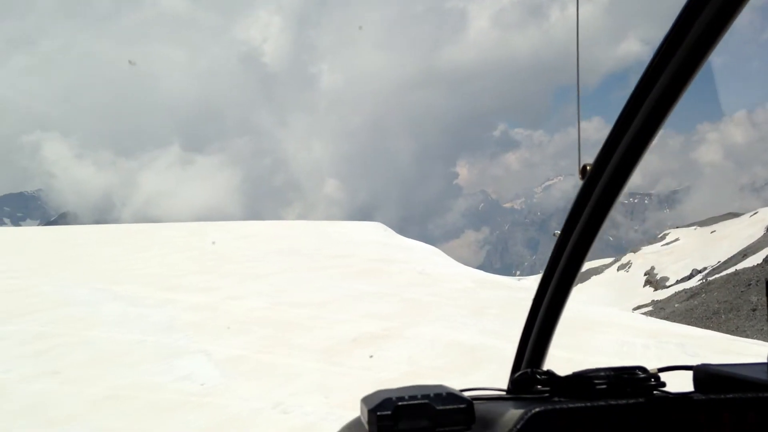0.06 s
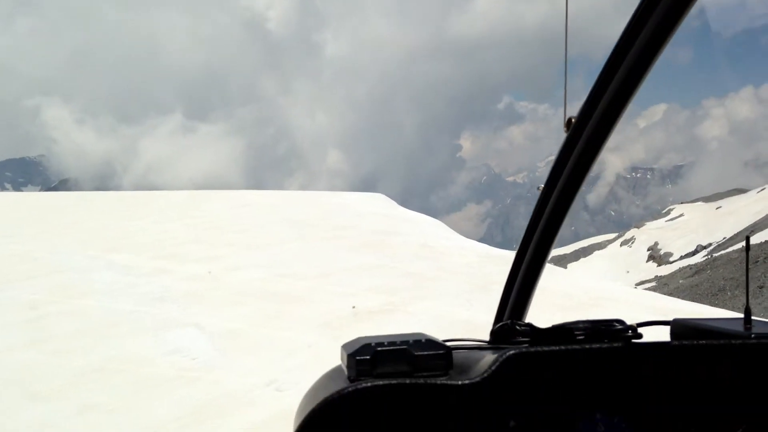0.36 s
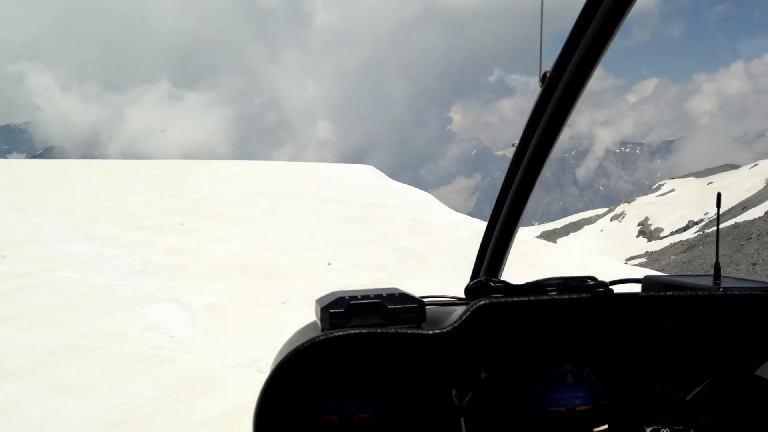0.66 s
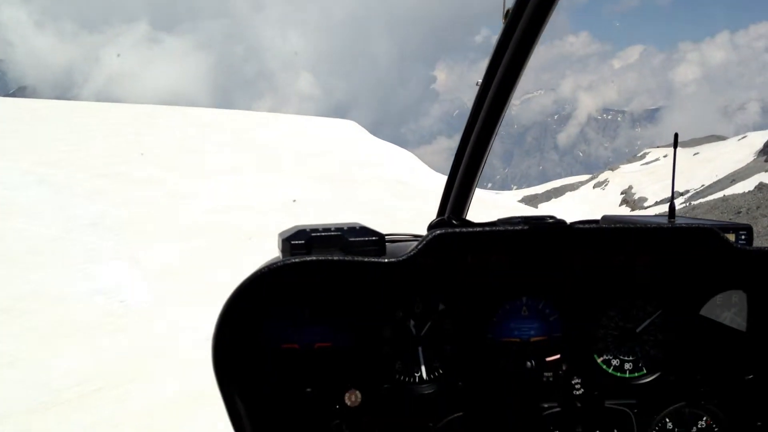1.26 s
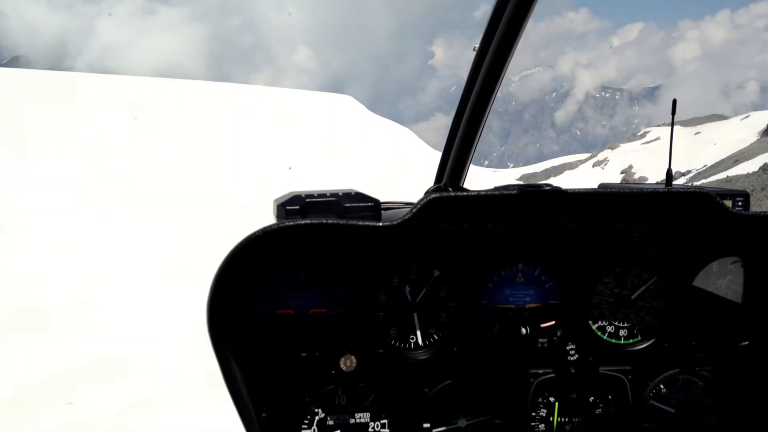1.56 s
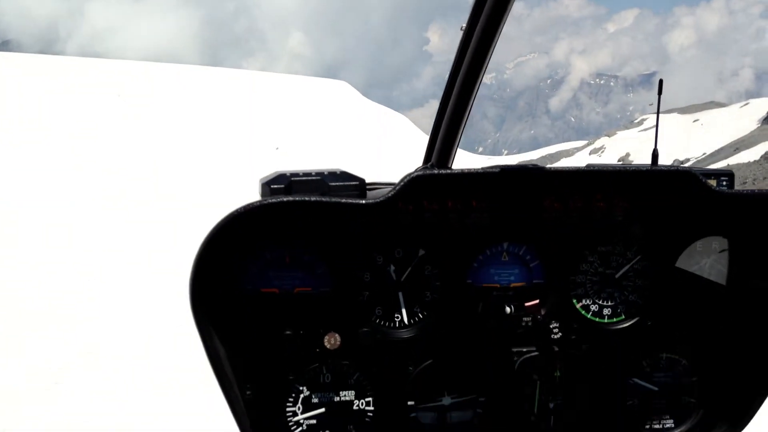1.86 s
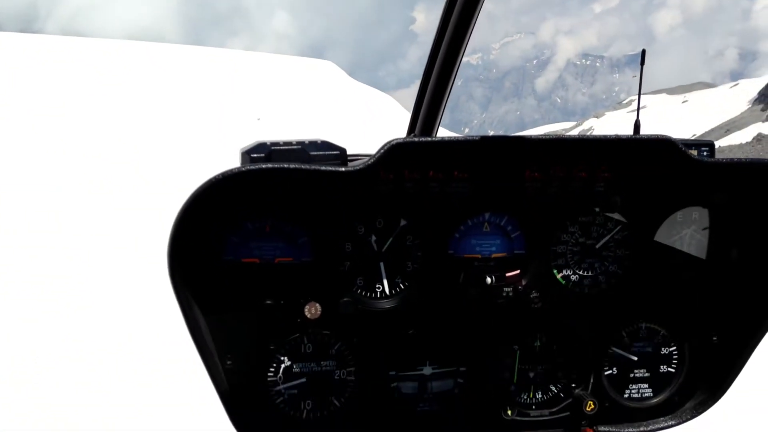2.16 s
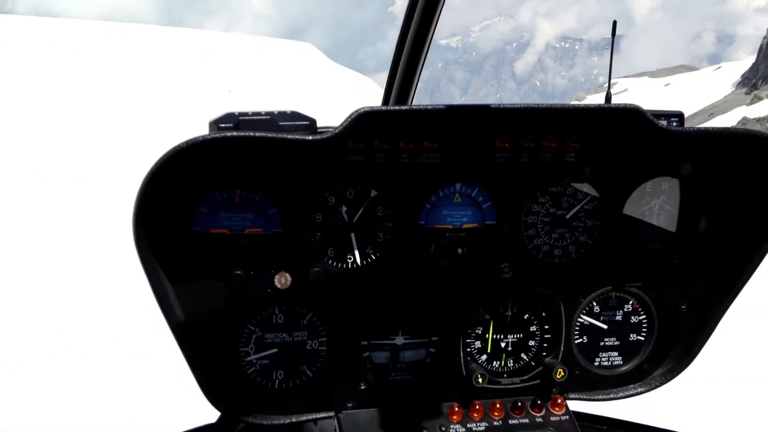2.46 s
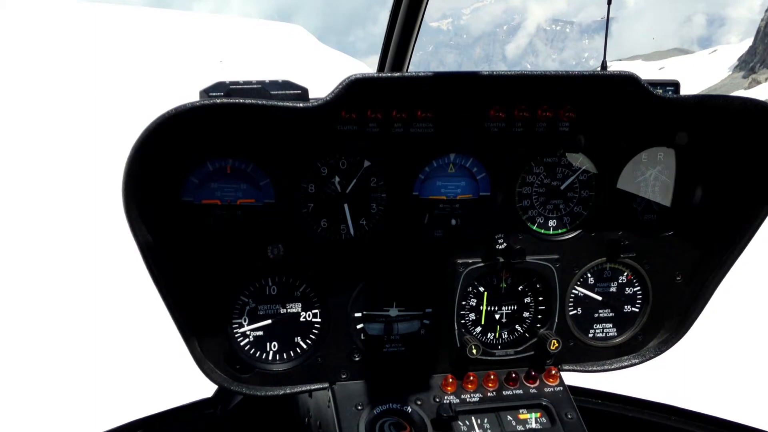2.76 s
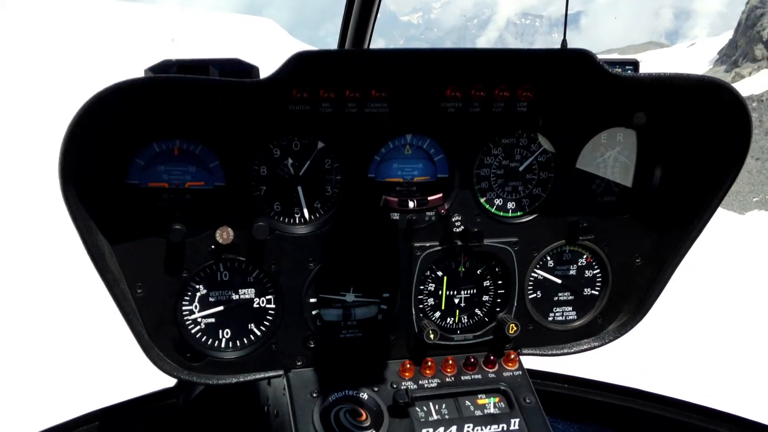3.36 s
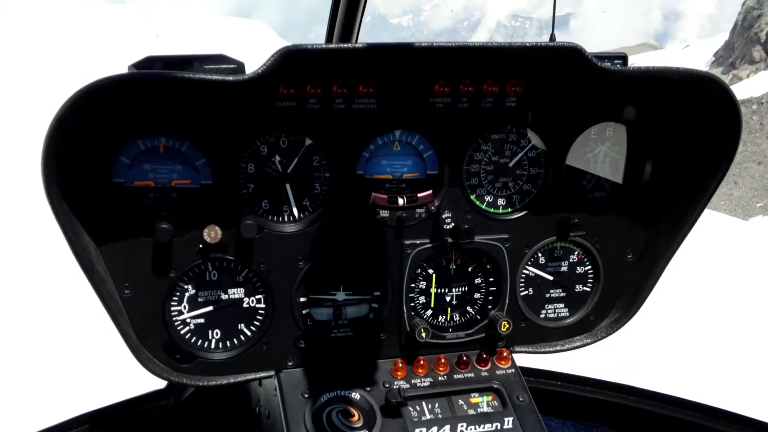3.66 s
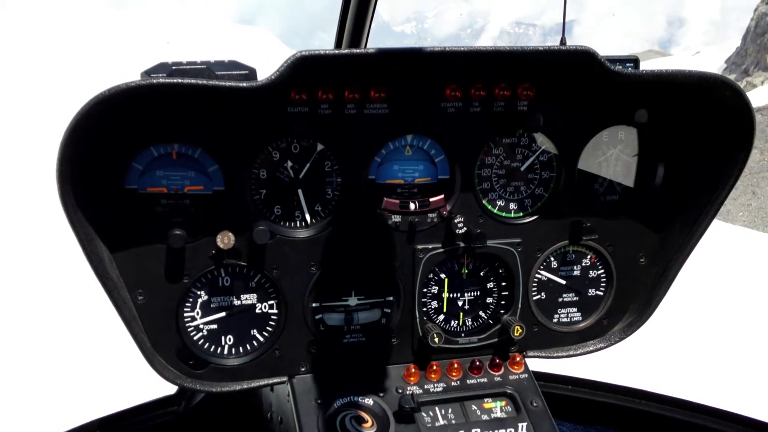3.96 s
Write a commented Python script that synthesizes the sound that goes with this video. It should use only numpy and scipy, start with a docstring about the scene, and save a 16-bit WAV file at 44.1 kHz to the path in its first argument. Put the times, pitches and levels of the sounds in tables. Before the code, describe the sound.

A small helicopter is heard from inside its cabin for about four seconds. From the start, the engine drones with a wavering fan hum, while the rotor thumps rapidly and evenly and air rushes in pulses. At about 1 second, sharper blade slaps with a bright crack join, growing slightly and lasting to the end. Beneath, soft irregular knocks continue and a low roar gradually eases.

```python
"""Inside a light piston helicopter, low over a snowfield. The six-cylinder engine drones, its fan hums.
Each pass of a main blade thumps the cabin; after a second the blades start slapping through their own
wake, ringing the panels with a bright crack on top. Air rushes over the canopy, surging and pulsing
with the rotor. Soft knocks and the low roar of the airframe fill out the bottom end."""
import sys
import numpy as np
from scipy import signal
from scipy.fft import rfft, irfft
from scipy.io import wavfile
from scipy.ndimage import uniform_filter1d

SR = 44100
rng = np.random.default_rng(int(sys.argv[2]) if len(sys.argv) > 2 else 0)


def generate_wav(sig):
    """Save sig (samples, or channels by samples) to the path in sys.argv[1] as 16-bit PCM at SR."""
    pcm = np.round(np.clip(np.atleast_2d(sig).T, -1, 1) * 32767).astype(np.int16)
    wavfile.write(sys.argv[1], SR, pcm)


N = 176400
BLADE_HZ, FIRST_PASS_S = 13.5241, .0324
CYCLE_HZ, FAN_HZ = 22.6, 386.3  # one four-stroke cycle is two crankshaft turns

# A gain_db is relative: the layer's overall level is set in its function.
# Engine partials, the sixth being the firing rate: cycle_multiple, level_db, waver_db
ENGINE_PARTIALS = [(5, -40, 2), (6, -16.5, 0.52), (7, -31.5, 3.5), (8, -27, 2.5), (9, -30.5, 1.5),
                   (10, -30.5, 2), (11, -35, -2.5), (12, -28, 2), (14, -43.5, -2), (18, -38, 1.5),
                   (24, -48.5, -1), (48, -49, -1.5), (54, -50, 1)]
# Fader rides through the flight: time_s, thump_gain_db, air_gain_db, fan_gain_db
FLIGHT_RIDES = [(0, 4, 0.5, 1.5), (.4, 1.5, -1, 6), (.55, -11, -1, 1), (.72, 3.5, -.5, 2.5),
                (1.1, 1.5, -.5, 4), (1.35, -4.5, -1.5, -2), (2.3, 1.5, -.5, 1), (2.6, -0.5, -0.5, -0.5),
                (3, -1, 0, 0.5), (4, 0, -2.5, -3)]
# Boom of the cabin's air under each thump: pitch_hz, gain_db, t60_s
CABIN_MODES = [(164.4, 4, 0.17), (204.7, 11.5, 0.21), (230, -39, 0.045), (278, -14, 0.065)]
# Ring of the panels under each slap: pitch_hz, gain_db, t60_s
PANEL_MODES = [(394, -10.5, .035), (486, 5, 0.048), (531, 3.5, 0.044), (624, 2, 0.073), (704, 3, 0.038),
               (790, -9.5, 0.023), (866, 2.5, 0.032), (913, -4.5, 0.026), (1083, -8, 0.039),
               (1177, 0, 0.069), (1202, -19, 0.063)]
# Blade slaps: start_s, body_gain_db, crack_gain_db
SLAP_HITS = [(0.92, -23.0, -39.0), (0.994, -24.0, -32.5), (1.068, -20.5, -30.0), (1.142, -20.5, -27.5),
             (1.215, -22.5, -33.5), (1.289, -23.0, -26.5), (1.363, -23.0, -31.5), (1.437, -23.0, -30.5),
             (1.511, -21.5, -34.0), (1.585, -21.0, -31.0), (1.659, -20.5, -27.5), (1.733, -19.5, -28.0),
             (1.807, -21.5, -33.0), (1.881, -22.0, -28.5), (1.955, -19.5, -27.5), (2.029, -21.5, -29.5),
             (2.103, -22.0, -31.0), (2.177, -21.0, -30.5), (2.251, -20.0, -32.0), (2.325, -22.5, -36.5),
             (2.399, -20.5, -32.5), (2.472, -20.5, -34.5), (2.546, -19.5, -30.5), (2.62, -19.0, -31.0),
             (2.694, -19.0, -34.5), (2.768, -20.0, -33.0), (2.842, -18.0, -30.0), (2.916, -17.0, -36.5),
             (2.99, -18.0, -32.0), (3.064, -19.0, -31.0), (3.138, -18.5, -32.0), (3.212, -18.0, -33.5),
             (3.286, -17.5, -29.0), (3.36, -18.5, -32.5), (3.434, -18.0, -28.5), (3.508, -20.5, -34.0),
             (3.582, -18.5, -30.0), (3.656, -19.5, -36.5), (3.73, -21.0, -31.0), (3.803, -20.0, -31.5),
             (3.877, -20.0, -29.5), (3.951, -19.5, -28.5)]
# Blows within a slap, three vortices then two cabin echoes: delay_s, first_slap_gain_db, last_slap_gain_db
SLAP_BLOWS = [(-.003, 0, 6), (.00025, 8.5, 5), (.0051, -1, 11), (0.0114, -1.5, -2.5), (0.0151, -9.5, -0.5)]
# EQ of the cracks and puffs: frequency_hz, gain_db
CRACK_EQ = [(400, 7), (800, 7), (1250, -4), (1480, -12), (1950, 1.5), (2700, 0.5), (3700, -3), (5500, -14),
            (9000, -31), (15000, -51)]
# EQ of the air over the canopy: frequency_hz, gain_db
RUSH_EQ = [(100, -26), (300, 3), (450, 6.5), (620, 6.5), (780, 2.5), (1200, 0), (1420, -4.5), (2100, -8),
           (2700, -6.5), (3100, -10.5), (3500, -7.5), (4100, -15), (6000, -18.5), (9000, -27), (12000, -32),
           (15500, -37)]
# Swing of the air's surge: time_s, depth_db
SURGE_DEPTH = [(0, 1.5), (1.2, 2), (2.2, -0.5), (3.2, -0.2), (4, 0.5)]
# EQ of a thin hiss, as of air at the door seals: frequency_hz, gain_db
HISS_EQ = [(1500, -31), (3100, 3), (3350, -7), (3580, -2), (3850, -16.5), (4400, -7), (5000, -9),
           (9000, -21), (15000, -39)]
# Fader ride of that hiss: time_s, level_db
HISS_RIDE = [(0, -42.5), (.7, -47.5), (.9, -44), (1.45, -47.5), (1.7, -47), (2.1, -49), (2.3, -45.5),
             (2.6, -41), (2.9, -54), (3.4, -56), (4, -50)]
# Puffs of air before the slapping sets in: centre_s, level_db
PUFF_HITS = [(.045, -34), (.2, -31), (.298, -31), (.41, -35), (.765, -33), (.848, -32.5)]
# Soft low knocks: centre_s
KNOCK_TIMES = [.063, .104, .138, 0.175, .213, .29, .355, .405, .436, .66, .706, .818, 1.015, 1.085, 1.137,
               1.287, 1.45, 1.56, 1.607, 1.655, 1.768, 1.892, 1.925, 2.006, 2.632, 2.942, 3.057, 3.134,
               3.167, 3.21, 3.252, 3.291, 3.363, 3.495, 3.568, 3.645, 3.677, 3.913, 3.96]
# EQ of the airframe's roar: frequency_hz, gain_db
ROAR_EQ = [(30, -57), (75, -40), (108, -2), (150, -3.5), (225, 2.5), (278, -2), (315, -12), (380, -7),
           (460, -24), (900, -72)]
# Fader ride of that roar: time_s, level_db
ROAR_RIDE = [(0, -19), (1.15, -20.5), (1.45, -24), (2.5, -23.5), (4, -29)]
# EQ of the deep rumble: frequency_hz, gain_db
RUMBLE_EQ = [(10, -29), (28, -10), (50, -4), (90, 21), (130, -17), (250, -49)]


def engine(t):
    """The cylinders drone at their firing rate; uneven firing adds weaker partials around it."""
    cycles = np.cumsum(CYCLE_HZ * (1 + .001306 * wander(rate_hz=1.94))) / SR
    return sum(undb(level_db + waver_db * wander(rate_hz=11)) * tone(multiple * cycles)
               for multiple, level_db, waver_db in ENGINE_PARTIALS)


def cooling_fan(t):
    """The fan hums on one note, wavering in pitch and level."""
    pitch_hz = FAN_HZ * (1 + .004 * wander(rate_hz=11))
    hum = tone(np.cumsum(pitch_hz) / SR)
    return hum * undb(-32.5 + curve(FLIGHT_RIDES, t, column=3) + 2.5 * wander(rate_hz=16))


def blade_thump(t, level_db=-19, lead_s=.00612, scatter_db=0):
    """Each blade's pressure pulse booms in the cabin."""
    passes = np.arange(FIRST_PASS_S, N / SR, 1 / BLADE_HZ)
    gains = undb(curve(FLIGHT_RIDES, passes) + scatter_db * rng.standard_normal(len(passes)))
    return undb(level_db) * unit(strike(passes - lead_s, gains, ring(CABIN_MODES, t)))


def blade_slap(t, level_db=-28, jitter_s=.00012):
    """A blade cuts three vortices, each ringing the panels; the weight shifts slowly to the third."""
    starts, body_db, _ = np.array(SLAP_HITS).T
    weights = np.array([undb(np.linspace(first, last, len(starts))) for _, first, last in SLAP_BLOWS])
    blow_gains = undb(body_db) * weights / np.linalg.norm(weights, axis=0)
    panel_ring = ring(PANEL_MODES, t)
    slaps = np.zeros(N)
    for (delay_s, _, _), gains in zip(SLAP_BLOWS, blow_gains):
        times = starts + delay_s + jitter_s * rng.standard_normal(len(starts))
        slaps += strike(times, gains, panel_ring)
    return undb(level_db) * unit(slaps)


def blade_crack(t, boost_db=7, lead_s=.001, attack_s=.002, decay_s=.0081):
    """The bright edge of each slap: a few milliseconds of torn air."""
    starts, _, crack_db = np.array(SLAP_HITS).T
    age = t[:SR // 10]
    envelope = np.minimum(age / attack_s, 1) * np.exp(-np.maximum(age - attack_s, 0) / decay_s)
    return strike(starts - lead_s, undb(crack_db + boost_db), envelope) * noise(CRACK_EQ)


def rushing_air(t, surge_hz=8.993):
    """Rush and thin hiss surge, swell and flutter with the blades, and tremble with the engine."""
    def lfo(rate_hz, delay_s):
        return np.cos(2 * np.pi * rate_hz * (t - delay_s))

    rush = noise(RUSH_EQ) * undb(-28.5 + curve(FLIGHT_RIDES, t, column=2))
    hiss = noise(HISS_EQ) * undb(curve(HISS_RIDE, t))
    swish_db = lfo(BLADE_HZ, delay_s=FIRST_PASS_S + .014)
    flutter_db = .64 * lfo(2 * BLADE_HZ, delay_s=FIRST_PASS_S + .00083)
    crank_db = .44 * lfo(2 * CYCLE_HZ, delay_s=.011)  # once per crankshaft turn
    surge_db = curve(SURGE_DEPTH, t) * lfo(surge_hz, delay_s=.083)
    shudder_db = 1.3 * lfo(4 * surge_hz, delay_s=.016)
    flicker_db = 1.13 * wander(rate_hz=58)
    return (rush + hiss) * undb(swish_db + flutter_db + crank_db + surge_db + shudder_db + flicker_db)


def air_puffs(t, width_s=.0071):
    """Soft, bright puffs as a blade brushes disturbed air."""
    envelope = sum(undb(level_db) * swell(t - centre_s, width_s) for centre_s, level_db in PUFF_HITS)
    return noise(CRACK_EQ) * envelope


def low_knocks(t, pitch_hz=68, width_s=.0039, gain_db=-21.5):
    """Dull, irregular knocks, each one deep cycle long."""
    offsets = (t - centre_s for centre_s in KNOCK_TIMES)
    return undb(gain_db) * sum(np.sin(2 * np.pi * pitch_hz * dt) * swell(dt, width_s) for dt in offsets)


def airframe(t, rumble_db=-42.5):
    """The shell's low roar lays the bed, over a faint deep rumble."""
    roar = noise(ROAR_EQ) * undb(curve(ROAR_RIDE, t))
    return roar + noise(RUMBLE_EQ) * undb(rumble_db)


def undb(db):
    """Decibels to linear gain."""
    return 10 ** (np.asarray(db) / 20)


def unit(x):
    """Scale to rms 1."""
    return x / np.sqrt(np.mean(x ** 2))


def curve(table, times, column=1):
    """One column of a table as an automation line with straight ramps."""
    rows = np.array(table, float)
    return np.interp(times, rows[:, 0], rows[:, column])


def swell(offset_s, width_s):
    """A bell-shaped fade in and out."""
    return np.exp(-.5 * (offset_s / width_s) ** 2)


def wander(rate_hz):
    """Random sample-and-hold, smoothed twice, at rms 1."""
    hold = int(SR / rate_hz)
    steps = rng.standard_normal(2048)[np.arange(N) // hold % 2048]
    return unit(uniform_filter1d(uniform_filter1d(steps, hold), hold))


def tone(turns):
    """A sine of rms 1 with a random starting phase."""
    return np.sqrt(2) * np.sin(2 * np.pi * (turns + rng.random()))


def noise(eq, ripple_db=3, ripple_spacing_hz=45.7):
    """Equalised noise of rms 1, coloured by the fine peaks and dips of the small cabin."""
    eq_hz, eq_db = np.array(eq, float).T
    bin_hz = np.maximum(np.fft.rfftfreq(N, 1 / SR), 1)
    ripple = np.interp(bin_hz / ripple_spacing_hz, np.arange(1024), rng.standard_normal(1024))
    ripple *= np.clip(bin_hz / 1500, 0, 1) ** 2  # smooths out toward the bass
    gain = undb(np.interp(np.log(bin_hz), np.log(eq_hz), eq_db) + ripple_db * ripple)
    return unit(irfft(rfft(rng.standard_normal(N)) * gain, N))


def ring(modes, t, band_hz=(120, 1400)):
    """The band-passed ring of damped modes after one hit."""
    age = t[:SR // 4]
    ringing = sum(undb(gain_db) * np.sin(2 * np.pi * pitch_hz * age) * np.exp(-np.log(1000) * age / t60_s)
                  for pitch_hz, gain_db, t60_s in modes)
    return signal.sosfilt(signal.butter(5, band_hz, "band", fs=SR, output="sos"), ringing)


def strike(times, gains, response):
    """Trigger a response at each time, with its own gain."""
    pulses = np.zeros(N)
    np.add.at(pulses, np.clip((times * SR).astype(int), 0, N - 1), gains)
    return signal.fftconvolve(pulses, response)[:N]


def scene():
    """Engine, rotor, air and low end, mixed to mono."""
    t = np.arange(N) / SR
    drone = engine(t) + cooling_fan(t)
    rotor = blade_thump(t) + blade_slap(t) + blade_crack(t)
    return (drone + rotor + rushing_air(t) + air_puffs(t) + low_knocks(t) + airframe(t))[None]


def record(dry):
    """Soft-clip the highest peaks and cut the very top of the treble."""
    ceiling, cutoff_hz = .82, 15400
    rounded = dry / (1 + (dry / ceiling) ** 6) ** (1 / 6)
    return signal.sosfilt(signal.ellip(10, .2, 80, cutoff_hz, fs=SR, output="sos"), rounded)


dry = scene()
out = record(dry)
generate_wav(out)
```